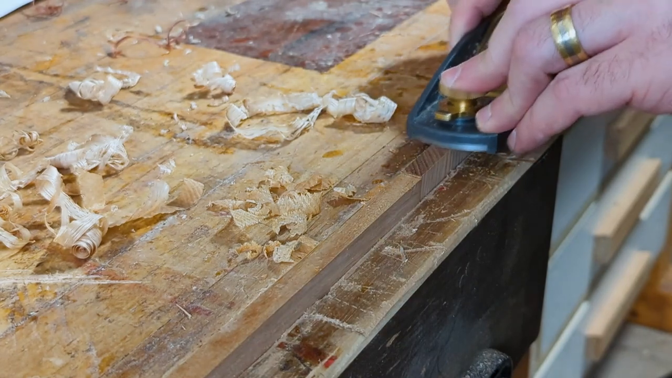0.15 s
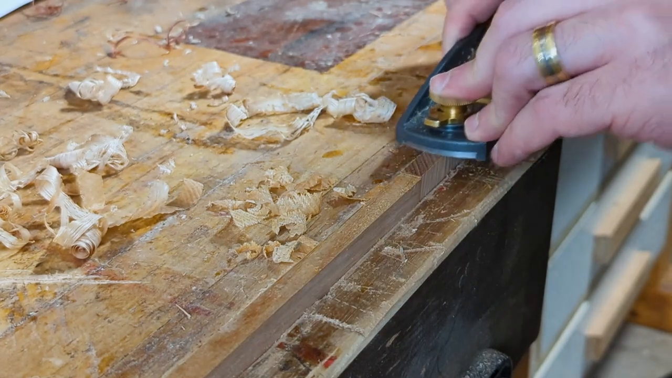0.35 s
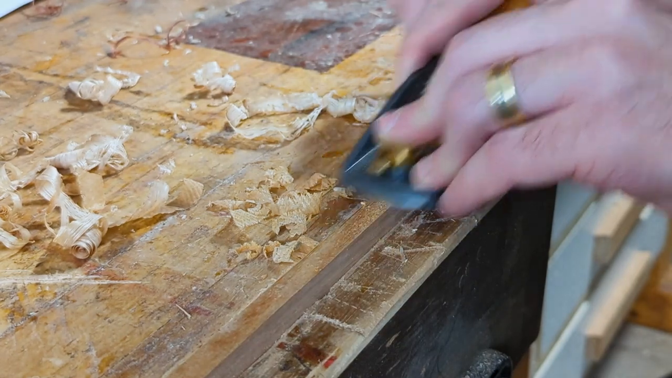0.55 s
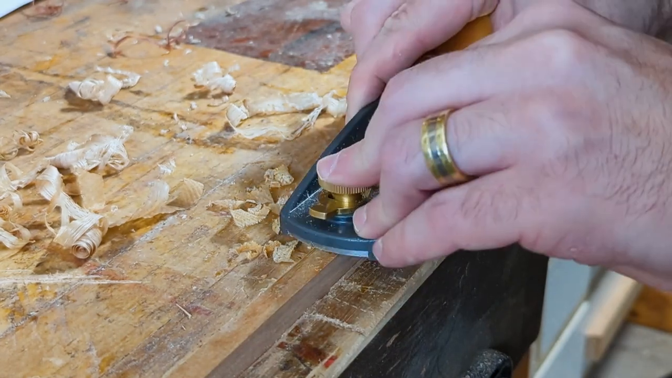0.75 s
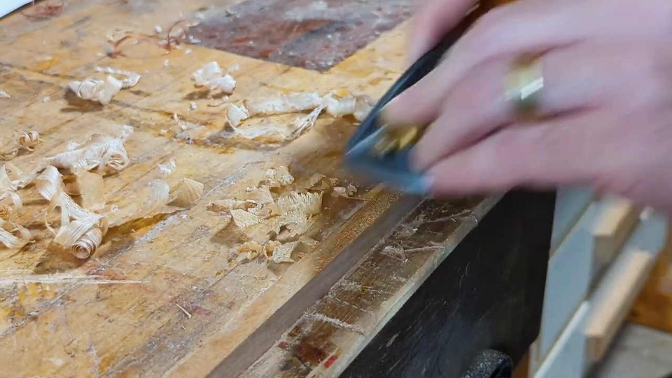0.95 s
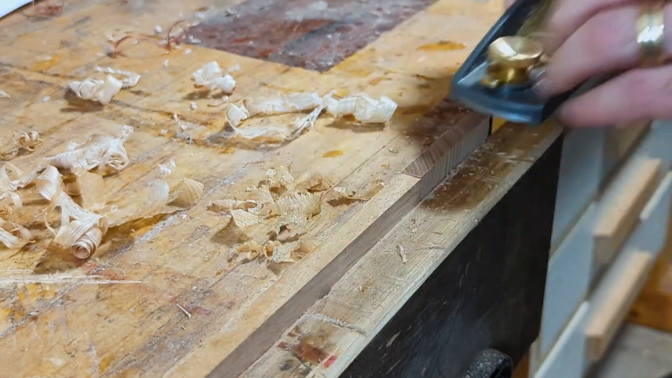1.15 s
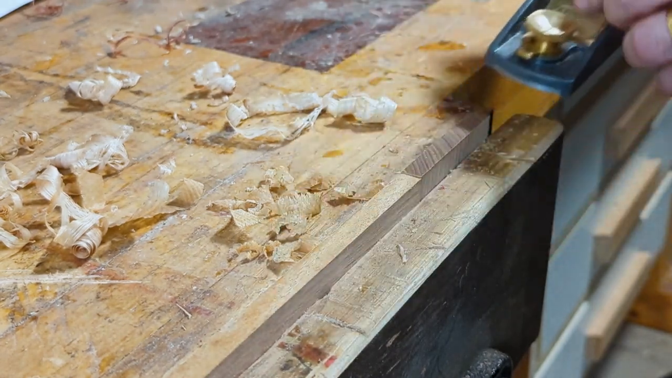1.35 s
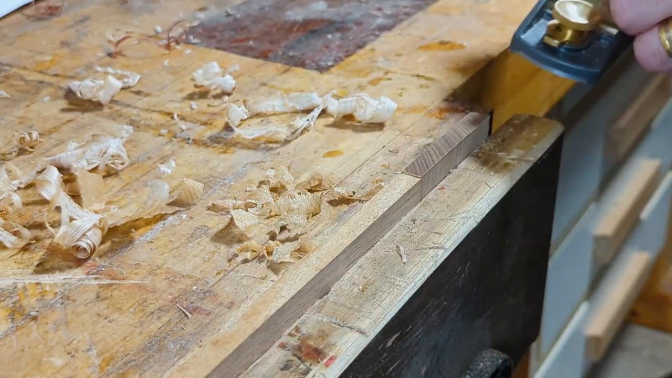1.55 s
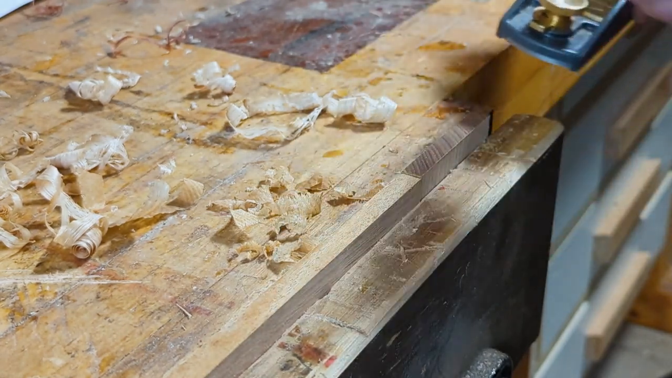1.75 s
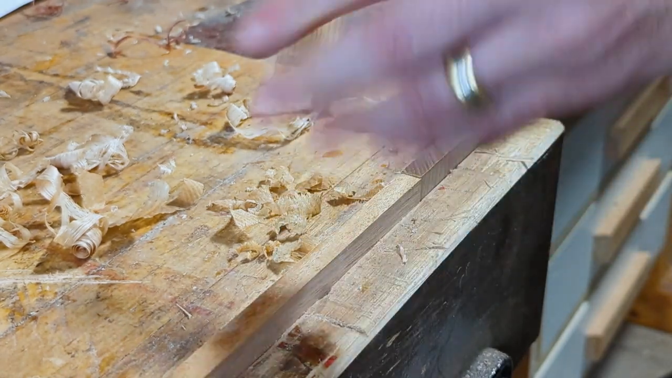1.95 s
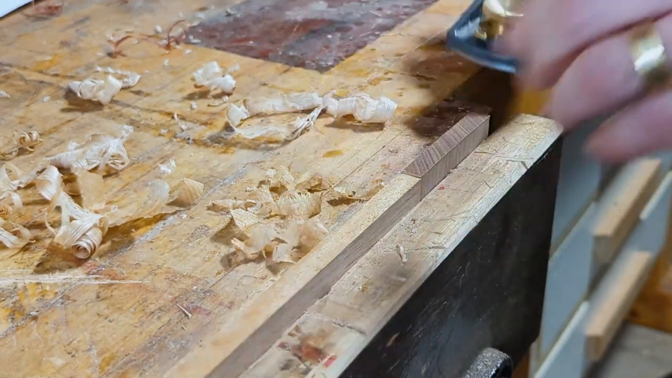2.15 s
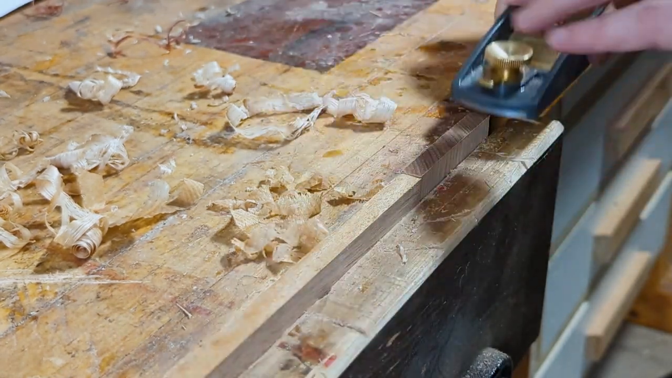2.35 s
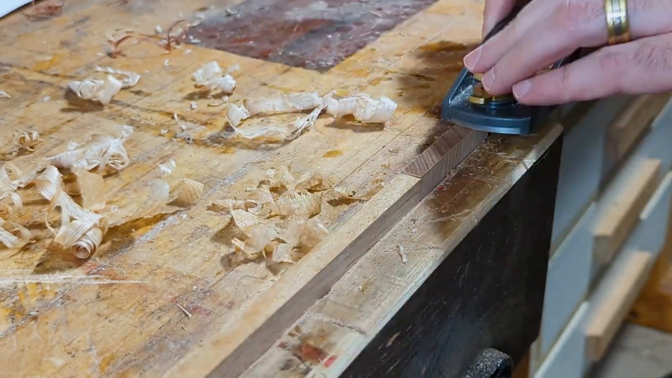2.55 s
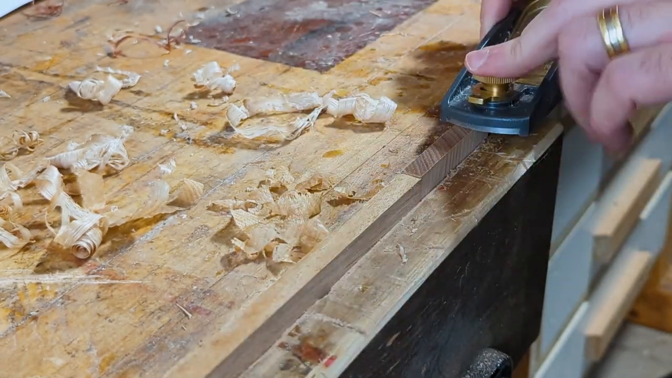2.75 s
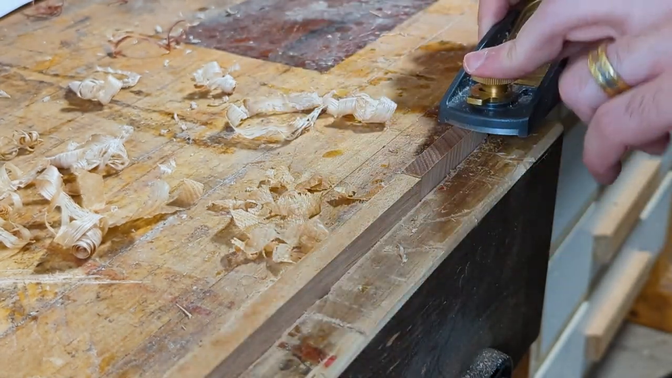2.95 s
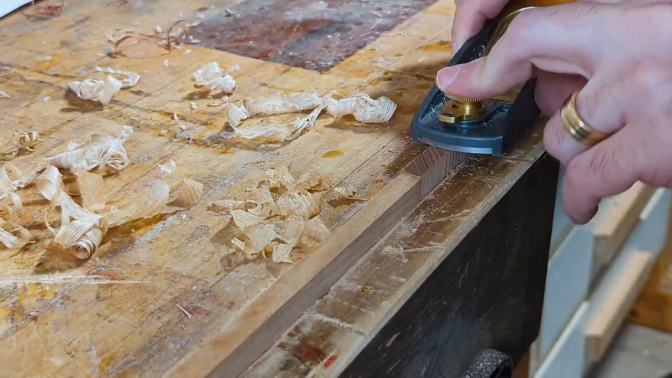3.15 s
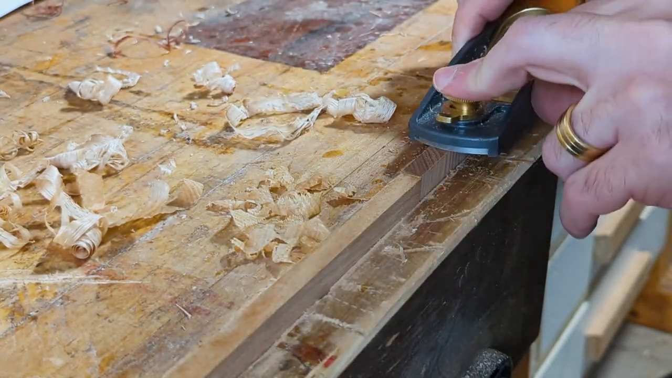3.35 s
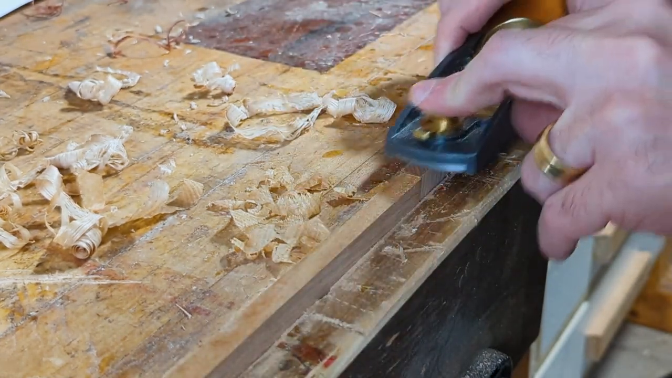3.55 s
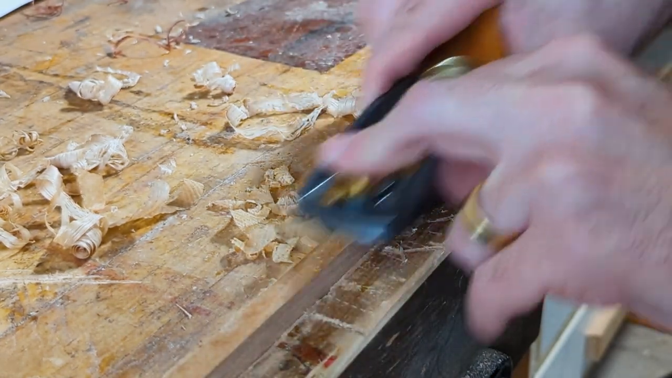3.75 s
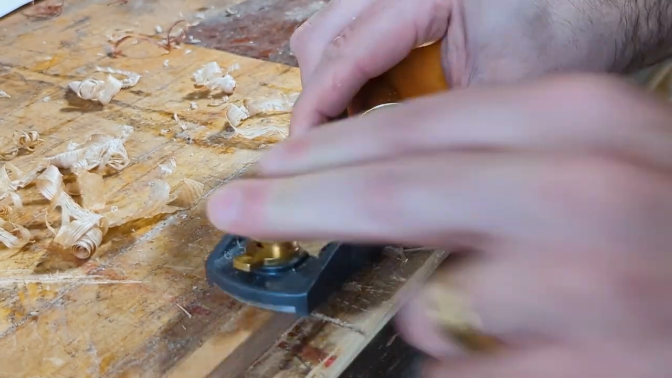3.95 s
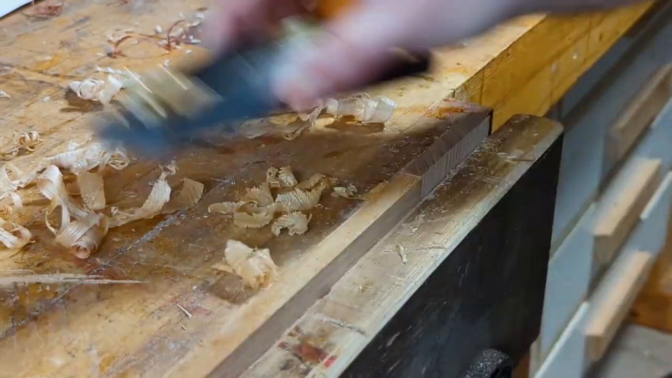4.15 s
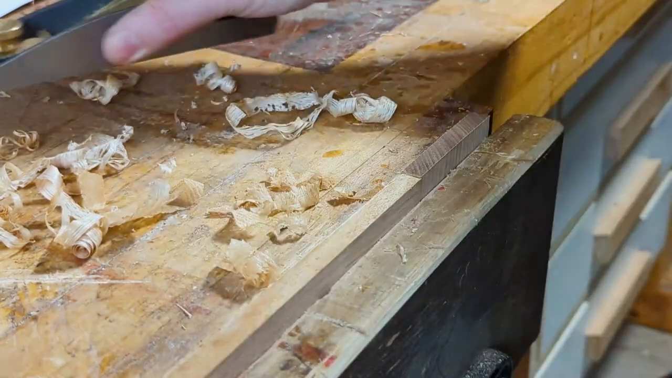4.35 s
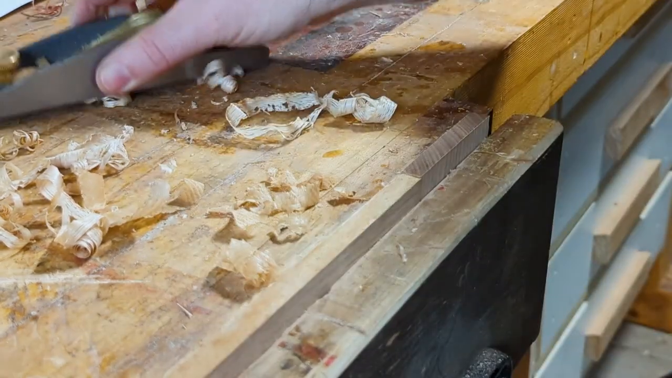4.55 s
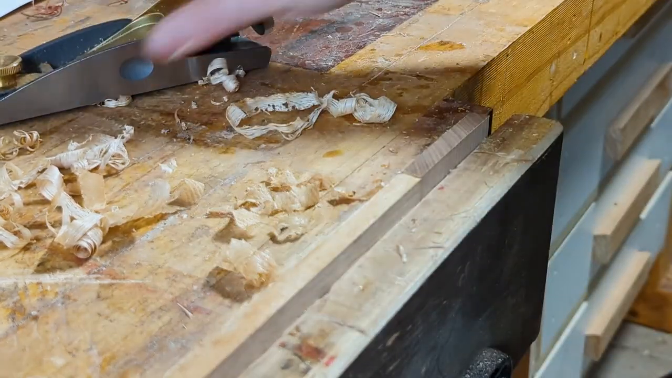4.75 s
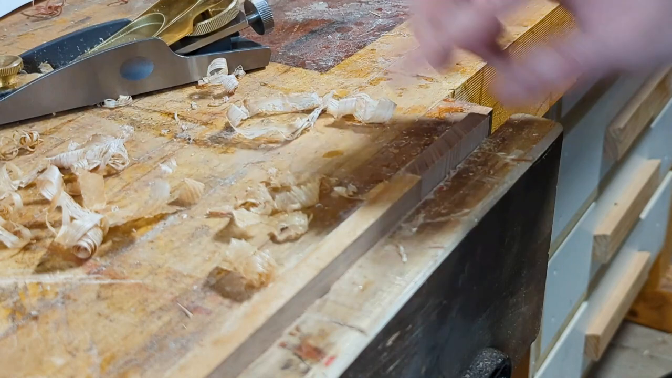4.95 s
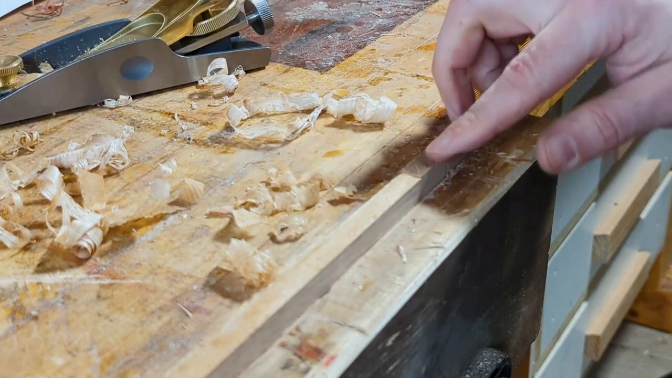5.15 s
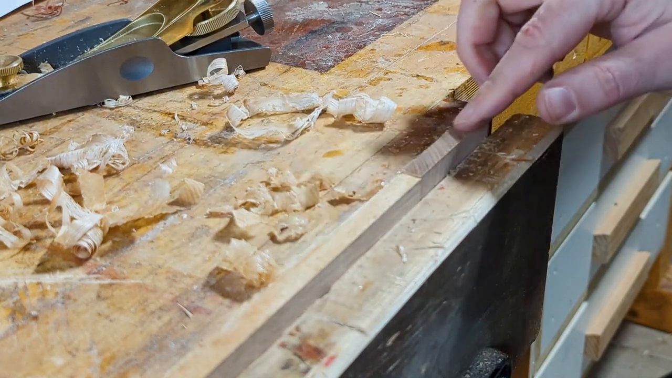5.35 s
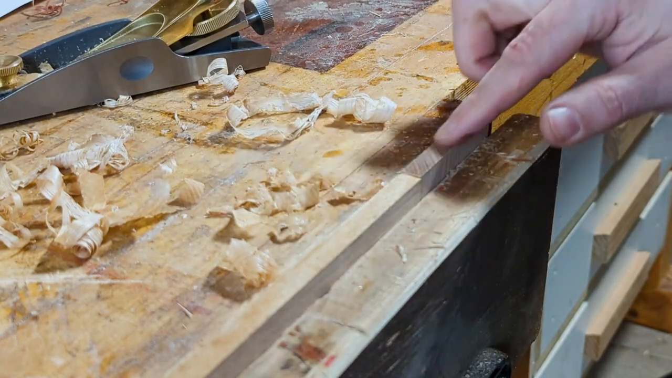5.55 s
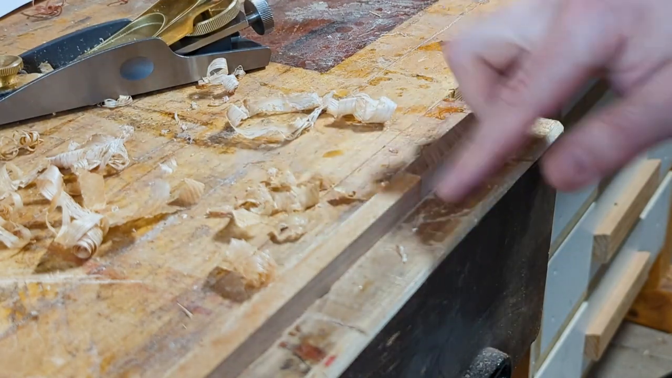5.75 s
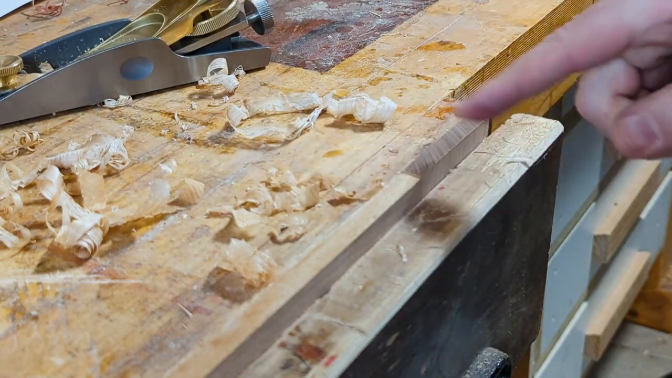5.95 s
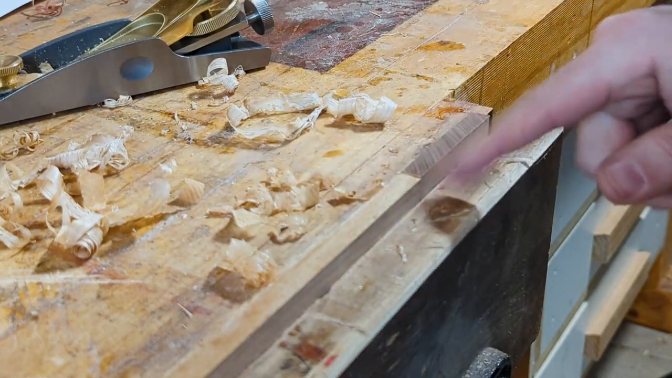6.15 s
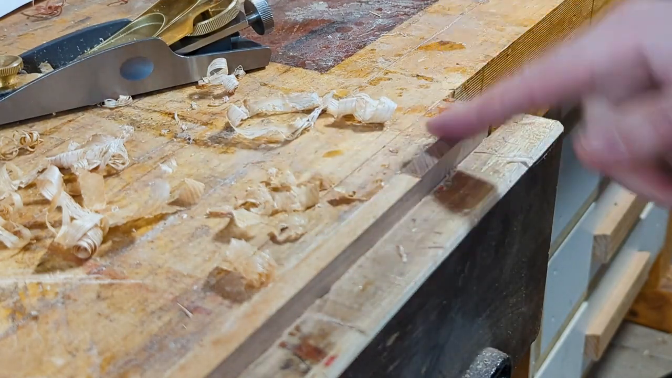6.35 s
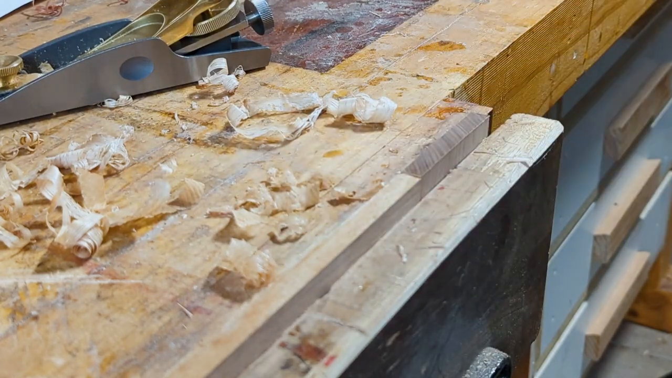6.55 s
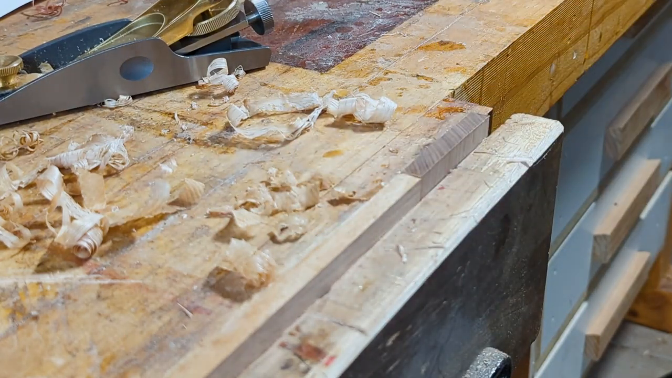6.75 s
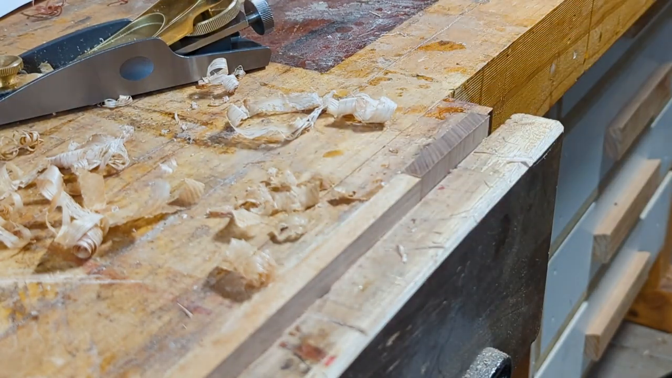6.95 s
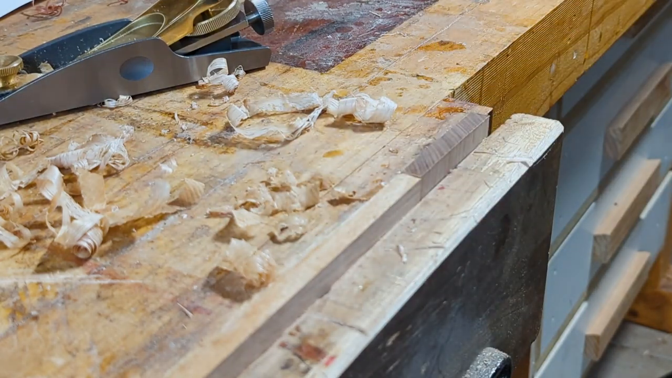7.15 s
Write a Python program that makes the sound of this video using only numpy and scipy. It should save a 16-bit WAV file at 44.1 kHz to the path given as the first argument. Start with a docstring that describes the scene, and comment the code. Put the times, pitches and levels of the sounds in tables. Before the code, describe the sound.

A small workshop with short, lively echo and a low wavering rumble, heard closely in stereo. A light rub and a small knock begin it; from about 0.3 s a piercing stick-slip squeal near 1.8 kHz breaks up and climbs in jumps to about 2.8 kHz by 0.6 s, with fibrous tearing and a hollow board shudder, fading by 0.85 s with a knock. Relative quiet follows until two dull wooden knocks at 2.45 s. A rub at 2.95 s leads to a second squeal at 3.1 s, around 2.2 kHz, which stalls, then bites again from 3.4 to 3.9 s with strong ripping. Soft scuffs at 4 s; at 4.6 s the plane clacks onto the bench, ringing briefly. Then come faint taps and finger rubs, tiny thin squeaks around 6.2 s, a brighter rub and light knock at 6.4 s, and faint rustling to 7.2 s.

```python
"""First a light rub, then the squeal of a block plane's blade tearing end grain, on a board in a bench vise.
The plane takes two slow strokes and its sole knocks on the board between them; then it is put down on the
bench, a finger rubs the cut edge and the arm draws away. Squeals are stick-slip tones; tearing and rubbing
are filtered random fractures; knocks are blows that ring modes of wood and iron.
Two microphones in a small workshop that rings briefly: squeals mostly direct, tearing mostly room, low rumble."""
import sys
import numpy as np
from scipy import signal
from scipy.fft import rfft, irfft, next_fast_len
from scipy.io import wavfile
from scipy.ndimage import uniform_filter1d, map_coordinates

SR = 44100
rng = np.random.default_rng(int(sys.argv[2]) if len(sys.argv) > 2 else 0)


def put_to_file(sound):
    """Save the sound as 16-bit audio at rate SR, in the file named by the first command-line argument."""
    columns = np.atleast_2d(sound).T  # one column per channel
    safe = np.clip(columns, -1, 1)
    whole_steps = np.round(safe * 32767)
    wavfile.write(sys.argv[1], SR, whole_steps.astype(np.int16))


N = 318005


def amp(db):
    """Decibels to gain."""
    return 10 ** (np.asarray(db) / 20)


def unit(x):
    """Scale to rms 1."""
    return x / np.sqrt(np.mean(x ** 2) + 1e-20)


def along(points, hz):
    """Read (Hz, value) points at the given frequencies, on a log frequency axis."""
    point_hz, values = np.transpose(points)
    return np.interp(np.log(hz + 1), np.log(point_hz + 1), values)


def curves(rows):
    """One curve over the whole scene for each column after the time."""
    seconds, *columns = np.transpose(rows)
    t = np.arange(N) / SR
    return [np.interp(t, np.sort(seconds), column) for column in columns]


def during(rows):
    """1 from the first to the last time of a table, with soft edges, 0 elsewhere."""
    t = np.arange(N) / SR
    inside = (t >= rows[0][0]) & (t <= rows[-1][0])
    return uniform_filter1d(1. * inside, size=300)


def levels(tables):
    """Gain curves for the dB columns of several movements, added together."""
    return sum(amp(curves(rows)) * during(rows) for rows in tables)


def wobble(rate, size=N):
    """A smooth random curve, rate random knots a second."""
    knots = rng.standard_normal(int(size * rate / SR) + 4)
    return map_coordinates(knots, [np.arange(size) * rate / SR])


def filtered(x, response):
    """Shape the spectrum of x by a response that is a function of frequency in Hz."""
    n = x.shape[-1]
    m = next_fast_len(n + 8192)
    hz = np.fft.rfftfreq(m, 1 / SR)
    return irfft(rfft(x, m) * response(hz), m)[..., :n]


def colour(points):
    """Response through (Hz, dB) points, falling steeply below the first."""
    return lambda hz: amp(along(points, hz)) * np.minimum(hz / points[0][0], 1) ** 4


def body(modes):
    """Response of (Hz, width Hz, dB) resonances; little is radiated outside their range."""
    first_hz, last_hz = modes[0][0], modes[-1][0]

    def response(hz):
        ring = 0
        for k, (centre, width, db) in enumerate(modes):
            # neighbouring modes have opposite signs
            mode = 1j * hz * width / (centre * centre - hz * hz + 1j * hz * width)
            ring = ring + (-1) ** k * amp(db) * mode
        return ring * np.minimum(hz / first_hz, 1) ** 2 / np.hypot(1, (hz / last_hz / 2) ** 2)
    return response


def grains(rate, spread_db):
    """Tiny fractures of uneven size, at random moments, rate a second."""
    breaks = rng.random(N) < rate / SR
    return breaks * rng.standard_normal(N) * amp(spread_db * rng.standard_normal(N))


def spread(response, width):
    """Stereo noise of rms 1; width is side over mid."""
    mid, side = filtered(rng.standard_normal((2, N)), response)
    return unit(np.array([mid + width * side, mid - width * side]))


# Overtones of the stick-slip motion. Each row: multiple of the pitch, level in dB before grip and shimmer.
OVERTONES = [(2, -19.5), (3, -25.5), (4, -30), (5, -38), (6, -47), (7, -51)]
ONSET_DB, RELEASE_DB_PER_S = 27.5, 1099.5  # growth during the rise, and rate of dying after the hold
BITE_S = .012  # time constant in which the bite at the first grip relaxes
EDGE_PER_DB = 0.33  # dB of overtone per dB of grip, before the weight of each overtone
BEAT_HZ, BEAT_DEPTH = 30.36, 0.55  # a held squeal throbs
SETTLE_S = 0.0096  # from the peak until the starting pitch has moved to the mode's own


def squeal(row, waver, scatter, flutter_db, shimmer_db, half_db):
    """The blade sticks and slips: a clean tone while locked on one mode, a ragged one between modes."""
    start, rise, hold, pitch, sharp, peak_db, bite_db, sag, rough, overtone_db = row
    t = np.arange(int((rise + hold + .1) * SR)) / SR
    held = np.maximum(t - rise, 0)
    rough = np.clip(rough, 0, 1)

    def chance(rate):
        return wobble(rate, size=SR)[:len(t)]

    onset = ONSET_DB * np.maximum(1 - t / rise, 0) ** 2
    release = RELEASE_DB_PER_S * np.maximum(held - hold, 0)
    grip = bite_db * np.exp(-held / BITE_S) - onset - sag * held - release  # dB

    hz = pitch + sharp * np.maximum(1 - t / (rise + SETTLE_S), 0)
    hz = hz * (1 + waver * chance(70) + scatter * rough * chance(500))
    phase = 2 * np.pi * np.cumsum(hz) / SR
    wave = np.sin(phase)
    for k, level in OVERTONES:
        # a harder grip sharpens the slips, which lifts the high overtones most
        sharpness = (overtone_db + EDGE_PER_DB * grip) * np.sqrt(k / 2)
        size = amp(level + sharpness + shimmer_db * chance(160))
        # uneven slips add unsteady tones halfway between the overtones
        halfway = amp(half_db) * chance(300) * np.sin((k - .5) * phase)
        wave = wave + size * (np.sin(k * phase) + halfway)

    throb = 1 + BEAT_DEPTH * np.cos(2 * np.pi * BEAT_HZ * held) * (1 - np.exp(-held / BITE_S))
    flutter = flutter_db * rough * chance(380) + chance(55)  # dB
    tone = np.sqrt(2) * throb * amp(peak_db + grip + flutter) * wave
    return np.pad(tone, (round(start * SR), N))[:N]


# Stick-slip squeals, one for each mode that blade and sole lock on.
# Each row: start in seconds, rise in seconds, hold in seconds, pitch in Hz, starting offset of pitch in Hz,
# level in dB before trim, bite (extra level at the peak) in dB, sag in dB per second,
# roughness (held to 0-1), overtone level in dB before the weight of each overtone.
SQUEALS = [ (0.066, 0.081, 0.074, 2696, 3, -43, -2.5, 3, 0.85, -16),
           (0.193, 0.0049, 0.012, 2220, 0.5, -33.5, 5, 99, 0.48, -18.5),
           (0.288, 0.05, 0.012, 1820, 10, -14.5, 1.5, 0.5, 0.16, -3),
           (.368, 0.022, 0.029, 1854, -0.5, -19.5, 4, 30, 0.2, -14.5),
           (0.43, .025, .03, 1890, 0, -31, 0, 19.5, .7, -12),
           (0.469, .005, 0.0025, 1950, 0.5, -24, 5.5, 103, 0.5, -12),
           (0.481, 0.0082, 0.0096, 2050, -5, -23.5, 5.5, 97.5, 0.6, -22),
           (0.495, 0.008, 0.007, 2337, -3, -27.5, 2.5, 98.5, 0.3, -19.5),
           (0.506, 0.0089, 0.014, 2480, -0.5, -24.5, 2.5, 103, 0.5, -15.5),
           (0.526, .016, 0.045, 2699, -0.5, -28, 3, 32, 0.4, -16.5),
           (0.589, .021, 0.01406, 2779, -7.5, -19.5, 5, 200.5, 0.15, -23.5),
           (0.629, 0.021, 0.18, 2785, 12, -33, 2, 58, 0.05, -22.5),
           (0.641, 0.023, .185, 2639, -0.5, -32, -4.5, 49, 0.1, -20),
           (2.957, .04, .09, 2636, 0.5, -49, -4, -2, 0.7, -16),
           (3.092, .0095, 0.26, 2166, 89.5, -17, 10, 54, 0.09, 3.5),
           (3.376, 0.016, 0.0083, 1800, 6, -38.5, 2, 93, 0.2, -3.5),
           (3.397, 0.041, 0.061, 2217, 1.5, -34, 1.5, 16, 0.5, -5),
           (3.415, .01, .03, 2805, 0.5, -38, 0.5, 58.5, 0.7, -15),
           (3.485, 0.01, 0.064, 1890, 0, -40, 3, 3.5, 0.7, -16.5),
           (3.488, .03, 0.06, 2690, -0.5, -29, -0.5, 3, 0.6, -15.5),
           (3.563, 0.0059, .008, 2477, 28.5, -28, 2.5, 100.5, .6, -14),
           (3.576, .018, .003, 2294, 152, -13.5, 3.5, 100.5, .1, -8.5),
           (3.595, .01, 0.31, 2235, 20.5, -17.5, -1, 50, 0.1, -0.5),
           (4.043, 0.036, 0.046, 738, 20, -48, -0.5, 98, 1.1, -18)]
PORT_PHASE = 1.2  # the two microphones catch a squeal this far out of step (radians)


def squeals():
    """All the stick-slip squeals of both strokes, mostly direct sound."""
    tone = sum(squeal(row, waver=0.0022, scatter=0.029, flutter_db=4.5, shimmer_db=4.5, half_db=-26)
               for row in SQUEALS)
    phase_shift = .5j * PORT_PHASE * np.array([[1], [-1]])
    pair = filtered(tone, lambda hz: np.exp(phase_shift))
    return amp(1.0) * shop(pair, wet_db=-4.5, pan_db=-1.3)


# Pushes of the blade through the wood, one table a push; the second stroke stalls and takes two.
# Each row: time in seconds, tearing fibres in dB, shaken board in dB, both before trims.
PUSHES = [
    [(.29, -70.5, -46), (.34, -57, -52), (.47, -50, -38), (.56, -53.5, -27.5), (.6, -50, -31),
     (.75, -76.5, -52), (.85, -94, -52.5)],
    [(3.1, -56, -60), (3.14, -67, -47), (3.22, -74, -50), (3.42, -82.5, -50.5)],
    [(3.412, -74, -50.5), (3.432, -53.5, -47.5), (3.52, -46, -37.5), (3.585, -50, -33.5),
     (3.605, -66.5, -50), (3.66, -57, -35), (3.71, -54, -29), (3.77, -52, -35), (3.92, -70.5, -51),
     (3.98, -107, -54)],
]
# Tone of the tearing fibres. Each row: frequency in Hz, relative level in dB.
FIBRES = [(1880, -28.5), (3200, 0), (3490, -9.5), (3750, -3), (4060, -7), (5780, -7.5), (9140, -1),
          (10800, -8.5), (11900, -3), (15700, -15)]
# Tone of the shaken board. Each row: frequency in Hz, relative level in dB.
BOARD = [(140, -56), (230, -17.5), (286, -11.5), (316, -15), (355, 2), (427, -9), (461, -4.5), (505, -11),
         (612, -8.5), (655, -17), (970, -15.5), (1120, -21), (1700, -19), (2210, -49), (3740, -120)]
# Resonances of the blade. Each row: frequency in Hz, width in Hz, relative level in dB.
BLADE = [(1862, 120, 1.5), (1950, 160, -6), (2268, 82, -1.5), (2590, 100, 1), (2757, 160, -2)]


def cutting():
    """The edge tears fibres; the same fractures ring the blade and shake the board."""
    fibre, board = levels(PUSHES)
    tears = grains(rate=9000, spread_db=4.0) * amp(4.4 * wobble(220))  # growth rings bunch the fractures
    hiss = amp(13.0) * fibre * unit(filtered(tears, colour(FIBRES)))
    blade_gain = amp(13.0) * fibre + amp(-12.5) * board
    rasp = blade_gain * unit(filtered(tears, body(BLADE)))
    wood = amp(-1.0) * board * unit(filtered(tears, colour(BOARD)))
    hiss = shop(hiss, wet_db=4.5, pan_db=3.0)
    rasp = shop(rasp, wet_db=4.0, pan_db=0.0)
    return hiss + rasp + shop(wood, wet_db=2.0, pan_db=-1.0)


GLIDE_ATTACK_S, GLIDE_RELEASE_S, GLIDE_SWELL_DB = 0.032, 0.0048, 2.5


def glide(start, length):
    """Gain of one rubbing movement: it eases in, gathers speed, and dies away."""
    t = np.arange(N) / SR - start
    attack = np.sin(np.pi / 2 * np.clip(t / GLIDE_ATTACK_S, 0, 1)) ** 4
    swell = amp(GLIDE_SWELL_DB * (np.clip(t / length, 0, 1) - .5))
    release = np.exp(-np.clip(t - length, 0, 1) / GLIDE_RELEASE_S)
    return attack * swell * release


# The sole, the finger and the sleeve gliding over wood.
# Each row: start in seconds, length in seconds, swish in dB, fine hiss in dB, hollow in dB, before the swell.
GLIDES = [ (0.025, .09, -59, -84.5, -63.5), (0.107, 0.1117, -47.5, -56, -59),
          (2.943, 0.054, -54.5, -79, -59.5), (2.993, .125, -44, -52, -57),
          (3.987, 0.049, -53, -62.5, -45.5), (4.049, 0.069, -51, -81, -59),
          (4.105, .45, -68.5, -79.5, -62.5), (4.547, 0.051, -51.5, -51, -61),
          (4.648, .09, -57.5, -56.5, -43.5), (4.777, 0.0536, -55, -65.5, -58.5),
          (5.134, .29, -58, -74, -60.5), (5.241, 0.093, -60.5, -61, -54), (5.484, 0.24, -61.5, -76, -64),
          (5.592, 0.041, -75, -73, -76.5), (5.717, 0.053, -62.5, -59, -61), (6.04, 0.24, -63, -80.5, -64),
          (6.106, 0.059, -68, -68.5, -81), (6.343, .26, -64.5, -79.5, -63),
          (6.402, 0.074, -50.5, -49, -52.5), (6.677, 0.415, -65, -82, -67.5),
          (6.895, .07, -67.5, -86, -62.5), (7.082, 0.138, -58, -66, -59)]
# Tone of the swish. Each row: frequency in Hz, relative level in dB.
SWISH = [(1200, -14.5), (1900, -0.5), (2700, -0.5), (3300, -8), (5000, -21.5), (8000, -37.5)]
# Tone of the fine hiss. Each row: frequency in Hz, relative level in dB.
HISS = [(3500, -9), (4500, -9), (6000, -3), (8000, -6.5), (10000, -3.5), (12500, -10.5), (15700, -12)]
# Tone of the hollow wood. Each row: frequency in Hz, relative level in dB.
HOLLOW = [(140, -35), (230, -4.5), (258, -17), (379, -2), (513, -5.5), (603, 2), (650, -6), (1030, -11.5),
          (1480, -7.5), (2200, -26), (2860, -55), (4840, -120)]


def gliding():
    """Light rubbing over the wood, with no shaving taken: dense small fractures heard in three tones."""
    gains = np.array([glide(*row[:2]) for row in GLIDES])
    swish, hiss, hollow = amp([row[2:] for row in GLIDES]).T @ gains
    rub = grains(rate=12000, spread_db=-1.0) * amp(2.0 * wobble(90))
    low = swish * unit(filtered(rub, colour(SWISH))) + hollow * unit(filtered(rub, colour(HOLLOW)))
    high = hiss * unit(filtered(rub, colour(HISS)))
    return shop(low, wet_db=2.5, pan_db=-1.0) + shop(high, wet_db=-2, pan_db=1)


# Faint thin squeaks, the first three while the finger rubs.
# Each row: start in seconds, length in seconds, mean pitch in Hz, level in dB before flutter.
SQUEAKS = [(6.213, .075, 2250, -55.5), (6.242, 0.04, 2695, -54), (6.288, 0.087, 2290, -59.5),
           (6.53, 0.1, 2330, -59), (6.793, 0.047, 2320, -58)]


def squeaks(waver=0.00664, flutter_db=6.0):
    """Faint thin squeaks: wavering sine tones that swell and fade."""
    t, out = np.arange(N) / SR, np.zeros(N)
    for start, length, pitch, db in SQUEAKS:
        swell = np.sin(np.pi * np.clip((t - start) / length, 0, 1))
        level = amp(db + flutter_db * wobble(64))
        hz = pitch * (1 + waver * wobble(90))
        out += swell * level * np.sin(2 * np.pi * np.cumsum(hz) / SR)
    return shop(out, wet_db=-4.5, pan_db=-0.5)


# Contacts of plane and hand with wood, first on an edge, then rocking flat.
# Each row: start in seconds, rocking time in seconds, thud, knock, clack, iron ring and tick in dB before
# trims and softening, softness cut-off in Hz.
KNOCKS = [ (.198, .012, -31, -30.5, -35.5, -35.5, -36, 15000),
          (.868, .014, -42, -37.5, -34, -37, -38, 15070), (1.927, 0.01, -68, -84, -88, -87, -64, 20000),
          (2.445, .011, -45.5, -32.5, -29.5, -38.5, -72, 4200),
          (2.478, .013, -45, -33, -40, -47, -86, 1293), (3.123, .014, -39, -53, -42.5, -46, -48, 15070),
          (4.01, .047, -39, -55, -47, -47, -54, 12000), (4.581, .007, -52, -65, -47, -41.5, -42, 15000),
          (4.596, .009, -43, -26.5, -20.5, -29.5, -31.5, 18080),
          (4.618, .024, -43, -34, -32, -51, -57.5, 9000),
          (4.809, .01, -50, -70.5, -43.5, -47, -51.5, 15000),
          (5.067, .018, -50, -50.5, -54.5, -50, -71.5, 2470),
          (5.318, .008, -52, -48, -50.5, -53, -62, 9000), (5.392, .01, -63, -56, -43.5, -62, -83.5, 2510),
          (5.829, 0.00612, -64, -70, -51.5, -67.5, -80, 2800),
          (6.46, .015, -51, -45.5, -61.5, -40, -43, 15070)]
# Landing flat is heavier and duller than the edge: change of thud, knock, clack, iron ring and tick in dB.
FLAT_DB = [7, 5.5, -2, -9.5, -12.5]
# Resonances of the bench under the thud. Each row: frequency in Hz, width in Hz, relative level in dB.
THUD = [(121.2, 25, 4), (154, 99, -6), (231, 31, -16.5)]
# Resonances of the bench top. Each row: frequency in Hz, width in Hz, relative level in dB.
BENCH = [(283, 26, -2.5), (362.8, 34, 3.5), (468, 110, -2.5), (602, 39, -2.5), (682, 52, -10.5)]
# Resonances of the clacking board. Each row: frequency in Hz, width in Hz, relative level in dB.
CLACK = [(716.5, 270, -2), (895, 42, 5), (975, 58, -2), (1166, 30, -3.5), (1226, 34, -1), (1494, 200, -3),
         (1740, 260, -8)]
# Resonances of the plane damped by the hand. Each row: frequency in Hz, width in Hz, relative level in dB.
IRON = [(2065, 190, -1.5), (2260, 290, -3), (2540, 150, 1), (2800, 120, -6), (3300, 40, -6.5),
        (4230, 730, -13.5)]
# Tone of the tick at the edge. Each row: frequency in Hz, relative level in dB.
TICK = [(2500, -18.5), (4000, 0.5), (10000, -0.5), (15000, -4)]


def knocks():
    """Each contact thuds the bench, rings its top, clacks the board, rings the iron and ticks at the edge."""
    t = np.arange(SR // 3) / SR
    # each part: response, t60 in seconds of the rattle after the blow, rattle against blow in dB
    parts = [(body(THUD), .15, 0), (body(BENCH), .08, -4), (body(CLACK), .05, -2),
             (body(IRON), .04, -3), (colour(TICK), .035, 10)]
    out = np.zeros((len(parts), N + SR))
    for start, rocking, *edge_db, soft_hz in KNOCKS:
        def soften(hz):
            """A soft contact leaves out the treble."""
            return (1 + 1j * np.sqrt(2) * hz / soft_hz - (hz / soft_hz) ** 2) ** -2

        flat_db = np.add(edge_db, FLAT_DB)
        for when, blow_db in [(start, edge_db), (start + rocking, flat_db)]:
            for track, db, (response, t60, rattle_db) in zip(out, blow_db, parts):
                rattle = rng.standard_normal(len(t)) * amp(-60 * t / t60)
                force = (t == 0) + amp(rattle_db) * rattle / np.linalg.norm(rattle)
                ring = unit(filtered(force, response))
                track[round(when * SR):][:len(t)] += amp(db - 21.0) * filtered(ring, soften)
    thud, knock, clack, iron, tick = out[:, :N]
    thud = amp(3) * shop(thud, wet_db=-16.0, pan_db=0.0)
    knock = amp(4.5) * shop(knock, wet_db=1.0, pan_db=-1.5)
    clack_and_iron = amp(2.5) * shop(clack + iron, wet_db=0.5, pan_db=0.2)
    tick = amp(0.5) * shop(tick, wet_db=-3.0, pan_db=4.0)
    return thud + knock + clack_and_iron + tick


# Modes of the plane ringing on, free of the hand.
# Each row: frequency in Hz, starting level in dB before the room, t60 in seconds.
FREE_IRON = [(2150, -37.5, 0.37), (2540, -34, 0.26), (3450, -42, 0.14)]
PUT_DOWN_S = 4.597


def put_down():
    """Let go on the bench, the iron body rings briefly in a few modes."""
    t = np.maximum(np.arange(N) / SR - PUT_DOWN_S, 0)
    ring = 0
    for hz, db, t60 in FREE_IRON:
        phase = 2 * np.pi * hz * t + .25 * wobble(100)
        ring = ring + amp(db - 60 * t / t60) * np.sin(phase)
    return shop(ring * (t > 0), wet_db=-5.5, pan_db=-1.0)


# Course of the rumble. Each row: time in seconds, level in dB before trim and waver.
RUMBLE = [(0, -50.5), (.95, -48.5), (1.05, -51.5), (1.6, -61.5), (2.1, -59), (2.45, -48.5), (2.7, -54),
          (2.9, -45.5), (3.55, -45), (3.7, -53.5), (4.1, -50.5), (4.65, -48), (5.4, -49), (6.05, -58.5),
          (6.42, -48), (6.75, -55), (7.2, -53.5)]
# Tone of the rumble. Each row: frequency in Hz, relative level in dB.
LOW = [(15, -78), (25, -54), (38, -46.5), (39, -28), (45, -30.5), (58, -15), (93, -2.5), (129, 2.5),
       (145, 2.5), (214, -3.5), (257, -13.5), (330, -17), (430, -35), (730, -120)]
# Tone of the air. Each row: frequency in Hz, relative level in dB.
AIR = [(150, -37), (260, -7), (507, -8.5), (553, 2), (645, -10), (703, -9.5), (766, -12.5), (1520, -14.5),
       (1600, -11.5), (2180, -13), (2630, -12.5), (2870, -16.5), (4040, -20), (4880, -22.5), (15700, -42)]
RUMBLE_DB, RUMBLE_WAVER_DB = -0.5, 1.5  # trim, and how far the rumble wavers about its level
AIR_DB = -64.5


def background():
    """Low wavering noise, nearly alike at both microphones, and faint wide air."""
    level_db, = curves(RUMBLE)
    level = amp(level_db + RUMBLE_DB + RUMBLE_WAVER_DB * wobble(9))
    return level * spread(colour(LOW), width=0.12) + amp(AIR_DB) * spread(colour(AIR), width=1.0)


# Decay of the small workshop. Each row: frequency in Hz, t60 in seconds.
SHOP = [(120, 0.21), (500, 0.38), (2200, 0.44), (5000, 0.33), (12000, 0.17)]


def shop(x, wet_db, pan_db):
    """Direct sound plus the workshop's answer, decaying noise that differs at each microphone."""
    hz, t, noise = signal.stft(rng.standard_normal((2, SR * 3 // 4)), SR, nperseg=256)
    decay = amp(-60 * t / along(SHOP, hz)[:, None])
    tail = signal.istft(noise * decay, SR, nperseg=256)[1]
    tail = np.pad(tail, ((0, 0), (130, 0)))  # the answer starts 130 samples late
    tail = tail / np.linalg.norm(tail[0])
    echo = signal.fftconvolve(np.atleast_2d(x), tail, axes=1)[:, :N]
    mix = (x + amp(wet_db) * echo) / np.hypot(1, amp(wet_db))  # keeps the power
    return mix * amp([[pan_db / 2], [-pan_db / 2]])


def scene():
    """Plane, bench, finger, faint squeaks and room."""
    return squeals() + cutting() + gliding() + squeaks() + knocks() + put_down() + background()


TOP_HZ = 15800


def record(dry):
    """The recorder keeps nothing above its band limit."""
    return filtered(dry, lambda hz: hz < TOP_HZ)


dry = scene()
out = record(dry)
put_to_file(out)
```